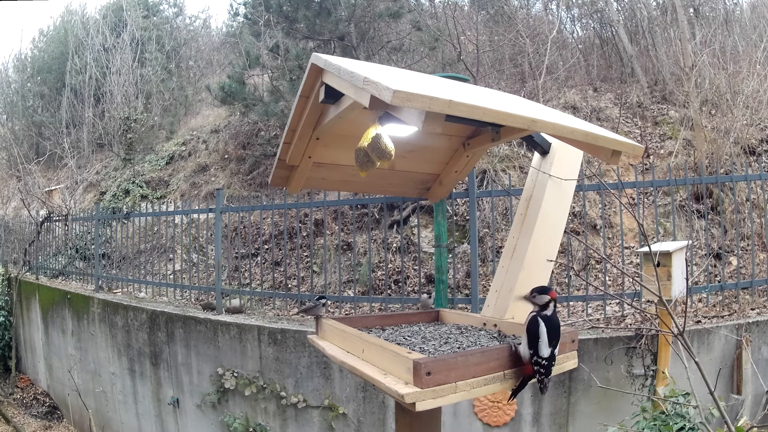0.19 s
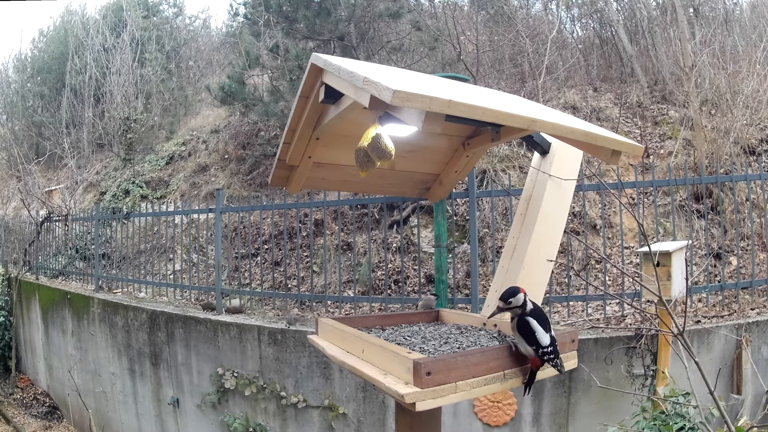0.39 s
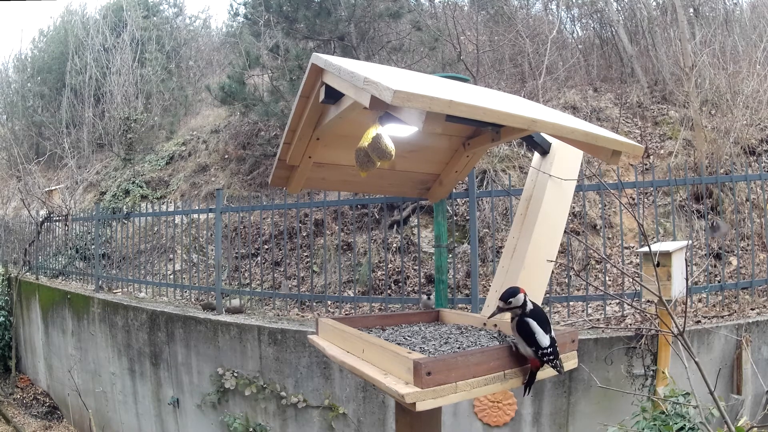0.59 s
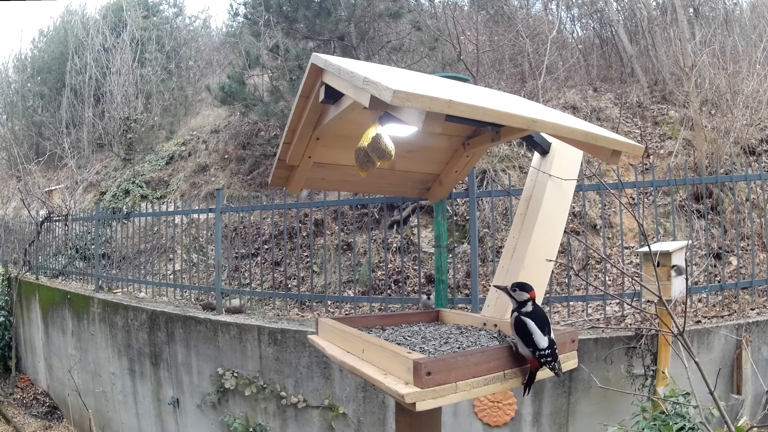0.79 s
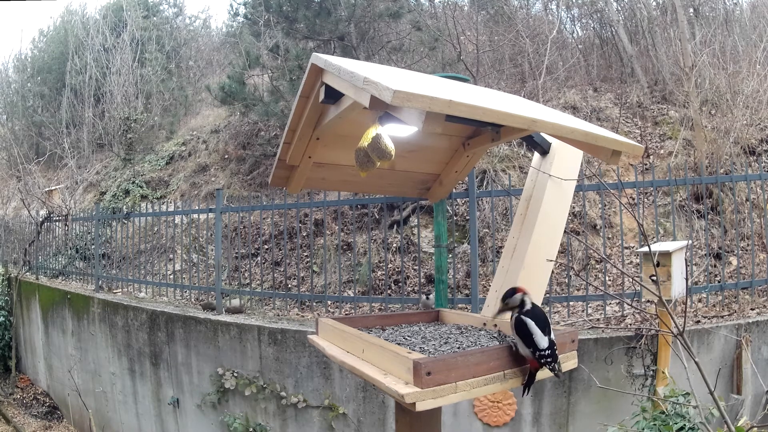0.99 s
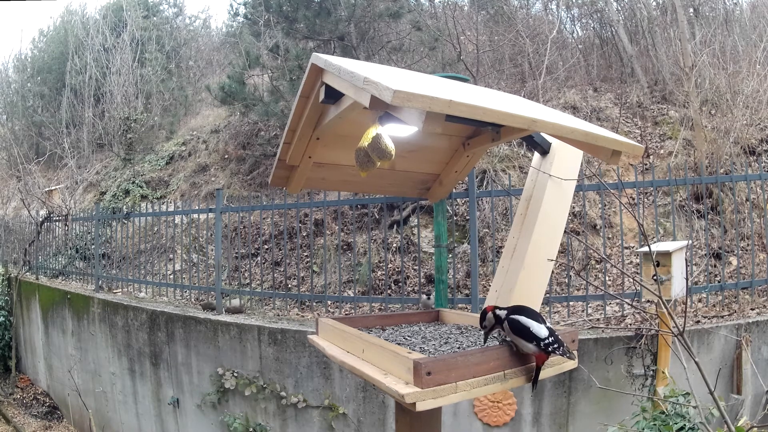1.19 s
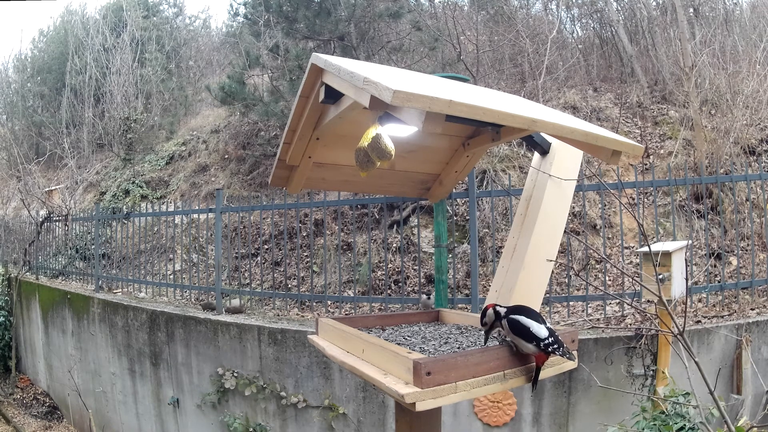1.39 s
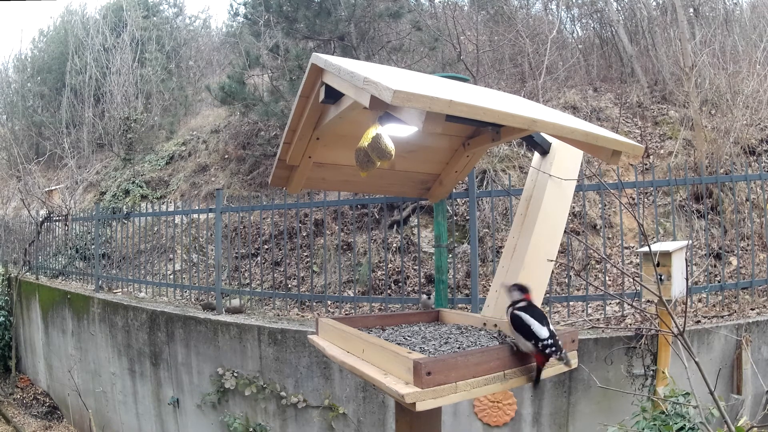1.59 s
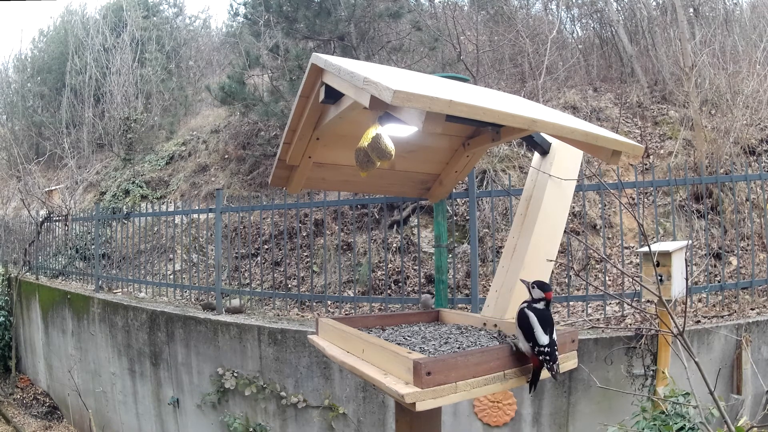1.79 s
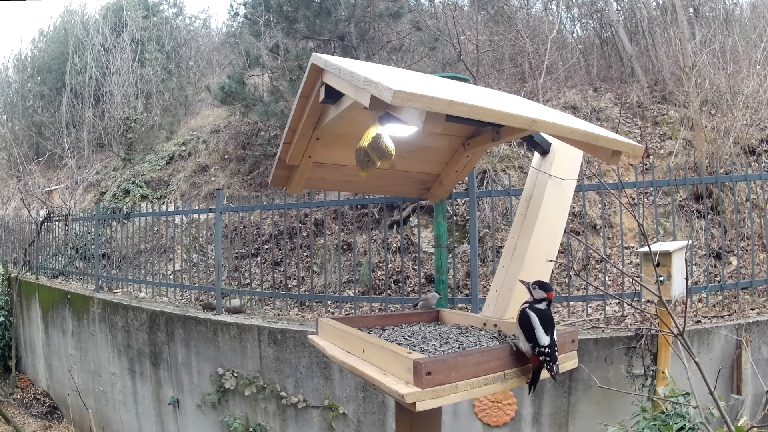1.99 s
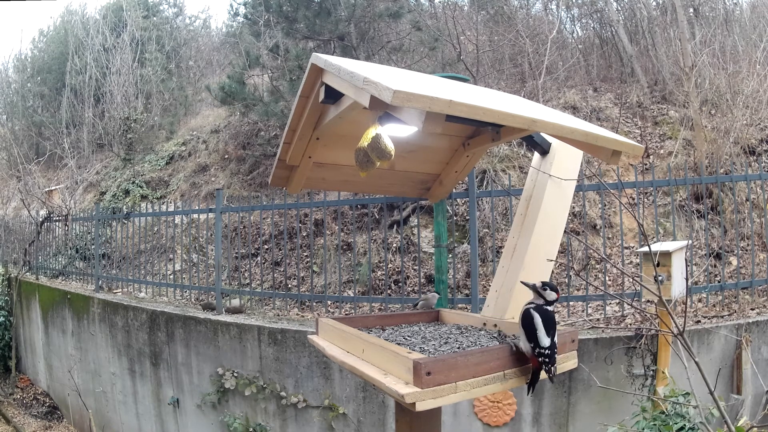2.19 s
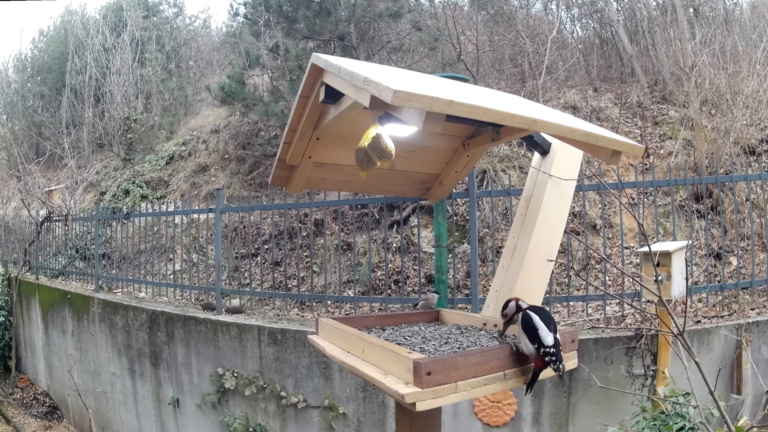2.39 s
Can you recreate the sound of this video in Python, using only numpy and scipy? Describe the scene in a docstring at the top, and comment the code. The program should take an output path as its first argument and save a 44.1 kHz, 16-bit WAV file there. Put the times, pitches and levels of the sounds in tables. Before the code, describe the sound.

Close to the microphone, beak and claws strike a wooden feeder tray, loudest early with wing thumps and a squeaky scrape, then faint dry pecks and seed ticks; garden hush left, hiss and buzz right.

```python
"""A woodpecker pecks and shuffles on a wooden tray: sharp contacts and crunches excite its damped modes.
Claws scrape by dense random catches and squeak by stick and slip; loose seeds tick faintly.
A small bird flaps off first: wingbeats push and pull air and leave eddies; feathers flutter later.
These are on the left with garden noise and a faint whine; the right has hiss and a camera's pulsing buzz."""
import sys
import numpy as np
from scipy import signal
from scipy.fft import rfft, irfft
from scipy.io import wavfile
from scipy.ndimage import uniform_filter1d

SR = 44100
rng = np.random.default_rng(int(sys.argv[2]) if len(sys.argv) > 2 else 0)


def to_wav(s):
    """Save 16-bit WAV."""
    ch = np.atleast_2d(s).T  # columns
    pcm = np.round(np.clip(ch, -1, 1) * 32767)  # PCM
    wavfile.write(sys.argv[1], SR, pcm.astype(np.int16))


N = 110250  # samples, 2.5 s

# Beak and claw contacts with the tray:
# start_s [s], strength_db [dB], bass_db [dB], treble_db [dB], crunch_s [s], focus_hz [Hz]
CONTACTS = [(0.2265, -40.5, 19, -1, 0.0005, 4600), (0.2504, 1.5, 3.5, -7, 0.00015, 4510),
            (0.2507, -10, 9.5, -5, .0008, 2600), (0.2557, -7.5, -15, 2, 0.002, 4030),
            (.26, -12, -2, 4.5, 0.0019, 9400), (0.291, -20, 12, 9, 0.0029, 4270),
            (.3127, -6.5, 7, -21, .0006, 2516), (0.3137, 7.5, -14, -3, .0005, 3818),
            (0.3132, -7.5, 1, -10, 0.00049, 450), (0.3163, -6.5, 4, 5.5, .0005, 8595),
            (0.3421, -17, 1, -2, 0.0004, 4110), (0.347, -20, -2.5, -1, 0.00062, 4346),
            (0.4265, -23.5, 0, 9, 0.00052, 5900), (0.4267, -36, 16.5, -10.5, 0.00045, 1800),
            (.649, -19.5, 4, 6, 0.00098, 4420), (0.66, -31, -6, 6.5, .0006, 4400),
            (0.6672, -29.5, 9, 5.5, 0.0008, 4400), (.67, -23.5, 0, 8, 0.0013, 4700),
            (0.6955, -23, 6.5, 1, 0.00091, 4010), (0.6968, -22.5, 17, -12, 0.0011, 1130),
            (0.7045, -26.5, 11, 0, 0.00079, 4320), (0.7074, -24, 14, -4, 0.001, 2200),
            (0.726, -30, -18, 10, .0006, 7000), (0.7476, -30, 11.5, -6, .0007, 2230),
            (0.7514, -31, 17, -5, 0.0013, 2000), (0.849, -28.5, -7, -20, 0.0003, 4070),
            (0.854, -42, 22.5, -12, 0.00068, 1780), (0.864, -33.5, 7.5, 3, .002, 1145),
            (0.982, -45.5, -8, -1.5, 0.0012, 3920), (1.065, -36.5, 5.5, -6, 0.0012, 3936),
            (1.112, -30.5, -21.5, -33, 0.0004, 3900), (1.1574, -23, 8, 12, 0.0021, 3940),
            (1.18, -36, 10, 7, 0.00077, 3840), (1.193, -44.5, -13, -9, .001, 3800),
            (1.307, -46.5, -5.5, -1.5, 0.00094, 8310), (1.369, -40, -10, -14, 0.00056, 3990),
            (1.479, -44.5, -9, 2.5, 0.0018, 3680), (1.729, -30.5, 6, -9, 0.0014, 4520),
            (1.731, -28.5, 4, -11, 0.00065, 4200), (1.7406, -34.5, 9, 5, 0.00095, 4150),
            (1.746, -37, -4, -6.5, .0007, 4000), (1.78, -34, 3.5, 2.5, 0.001, 3730),
            (1.801, -40, 7.5, 6, 0.00091, 3900), (1.866, -39.5, 8, -1, 0.00087, 3900),
            (1.8845, -35.5, -16, 5.5, 0.0012, 3880), (1.891, -31, -8, -6, 0.0023, 8200),
            (1.901, -34.5, 3, -0.5, 0.0012, 3890), (1.9296, -43, 12.5, 8, 0.00046, 3930),
            (1.9392, -45, -2, 10, 0.00054, 3760), (1.9868, -44, 9, 5, 0.00088, 3690),
            (2.1684, -46, -8, 4, 0.00075, 3830),]
# Damped modes of the tray, before each touch weights and bends them:
# pitch_hz [Hz], level_db [dB], t60_s [s]
TRAY_MODES = [(380, -20.5, 0.005), (613.5, -18.5, 0.0057), (1130, -16.5, 0.012), (1460, -11, 0.0071),
              (1800, -13.5, 0.011), (2332, -13.5, 0.01), (2660, -11, 0.0063), (3150, -10, .005),
              (3670, -2, 0.0064), (4210, -4, .007), (4950, -4.5, 0.0043), (5900, -15, 0.0051),
              (6613, -7.5, 0.0025), (8265, -1.5, 0.0028), (9220, -11.5, 0.0048), (10780, -20.5, 0.007),
              (13600, -26.5, 0.0023)]
# Claws dragging on wood and seeds:
# start_s [s], length_s [s], level_db [dB rms], bass_db [dB], treble_db [dB], focus_hz [Hz]
CLAW_STROKES = [(0.238, 0.033, -32.5, 8.5, 4, 4300), (0.266, 0.059, -42.5, 12, 0, 4160),
                (0.298, 0.022, -22, -1, -4, 4153), (0.312, 0.072, -42, 7.5, -10, 3800),
                (0.405, 0.056, -52.5, 6.5, 1.5, 5900), (0.628, 0.088, -48.5, 7.5, 0, 4530),
                (0.707, 0.06, -42.5, 12.5, 0.5, 2260), (0.762, 0.029, -44.5, 9.5, -7.5, 2430),
                (0.843, 0.04, -44, 14.5, -12, 1800), (1.169, 0.039, -52, 7.5, 1.5, 4010),
                (1.719, 0.052, -53.5, 9.5, -1, 4380), (1.863, 0.11, -58.5, 13, -4, 3900)]
# Path of a claw slipping in quick regular jerks: time_s [s], slip_rate_hz [Hz], level_db [dB]
SLIP_PATH = [(.265, 830, -38.5), (0.27, 1030, -30), (.274, 1450, -28.5), (.276, 1850, -23),
             (0.286, 2000, -25.5), (.297, 1920, -23), (0.305, 1650, -27.5), (0.311, 1800, -26.5),
             (.322, 1000, -37)]
# Wingbeats, each a push and a pull of air: centre_s [s], half_width_s [s], peak_db [dB]
WINGBEATS = [(0.1931, 0.0015, -21), (0.234, .0048, -7), (.266, .008, -17.5)]
# Strength of the eddies at the microphone: time_s [s], level_db [dB]
EDDY_LEVELS = [(0, -50), (.04, -43), (.1, -52.5), (.165, -46.5), (.19, -31.5), (.24, -24), (.29, -32.5),
               (.34, -44.5), (.45, -59.5), (.62, -49), (.69, -43.5), (.8, -65), (1.81, -67), (1.95, -54.5),
               (2.1, -67.5)]
# Strength of the soft feather flutter: time_s [s], level_db [dB]
FLUTTER_LEVELS = [(1.82, -64), (1.84, -41.5), (1.895, -48.5), (1.93, -67)]
# Noise spectra of eddies, feathers, garden and hiss: pitch_hz [Hz], density_db [relative dB per Hz]
EDDY_SPECTRUM = [(15, 0.5), (35, -0.5), (70, -6), (130, -10), (250, -18.5), (500, -34.5), (2000, -62),
                 (16000, -89)]
FEATHER_SPECTRUM = [(50, -5.5), (115, -2.5), (230, -10), (600, -20.5), (3000, -53)]
GARDEN_SPECTRUM = [(20, -4.5), (60, 0), (130, -5), (300, -13), (700, -18), (1600, -19), (3000, -30),
                   (6000, -36), (9000, -37.5), (12000, -44), (16000, -59.5)]
HISS_SPECTRUM = [(20, 4), (100, -1), (400, -4), (1500, -15), (4000, -20), (9000, -26.5), (12000, -36),
                 (16000, -49.5)]

GARDEN_DB, HISS_DB = -54.5, -60
WHINE_HZ, WHINE_WIDTH_HZ, WHINE_DB = 2785, 23, -72
# electrical buzz: bursts of spikes once a frame, each after a short gap
FRAME_HZ, SPIKE_HZ, FIRST_FRAME_S, GAP_S = 30, 350, 0.0053, 0.0034
SPIKE_DECAY_S, SPIKE_DB, STEADY_CURRENT_DB = 0.00056, -48.5, -49
BUZZ_LOW_HZ, BUZZ_HIGH_HZ = 60, 3100
# response of the tray to a touch
BASS_BELOW_HZ, TREBLE_ABOVE_HZ = 3100, 5800
STIFF_HZ = 900  # modes below this depend less on where the tray is touched
FOCUS_DB, FOCUS_OCTAVES = 9, 0.19
MODE_PULL = 0.35  # share of the way that nearby modes shift towards the focus
SEEDS_PER_S, SEEDS_DB, SEEDS_SPREAD_DB, SEEDS_BASS_DB, SEEDS_TREBLE_DB = 19, -53, 2.5, -16, -6
CATCHES_PER_S, CATCH_SPREAD_DB = 1500, 3
SCRAPE_ATTACK_S, SCRAPE_RELEASE = 0.0034, 0.55  # the release is a share of the stroke
SCRAPE_FOCUS = 0.22  # a moving claw favours one mode less than a knock does
SQUEAK_JITTER, SQUEAK_DB_PER_OCTAVE = 0.04, 4  # jitter is a share of the slip rate
SQUEAK_BASS_DB, SQUEAK_TREBLE_DB = 14, -30
CRUNCH, CRUNCH_RISE_S = 0.69, 0.00042  # norm of the crunch, beside a contact of 0.5
EVENNESS = 0.357  # how evenly a contact feeds all modes, 0-1
# overload
DUCK_ABOVE_DB, DUCK_SHARE = -19, 0.23  # dB of gain lost per dB of excess
PEAK_FALL_DB_PER_S = 28.5  # fall of the held power, not of the gain
CEILING, BAND_EDGE_HZ = 0.9, 15900


def amp(db):
    """Decibels express amplitude ratios logarithmically, twenty to a decade."""
    return 10 ** (np.asarray(db) / 20)


def unit(x):
    """Division by the root mean square gives unit rms."""
    return x / np.sqrt(np.mean(x ** 2) + 1e-20)


def add(mix, start_s, sound):
    """Superposition: a sound is summed into the mix at its start time."""
    part = mix[max(round(start_s * SR), 0):][:len(sound)]
    part += sound[:len(part)]


def noise(spectrum):
    """Spectral shaping: white noise is weighted by frequency and scaled to unit rms."""
    pitch_hz, density_db = np.transpose(spectrum)
    f = np.fft.rfftfreq(N, 1 / SR)
    density = amp(np.interp(np.log(f + 1), np.log(pitch_hz), density_db))
    white = rfft(rng.standard_normal(N))
    return unit(irfft(white * density * (f > 10), N))


def hiss():
    """Broadband random noise: a steady shaped hiss."""
    return amp(HISS_DB) * noise(HISS_SPECTRUM)


def buzz():
    """Periodic excitation: the camera draws bursts of decaying current spikes, one burst a frame."""
    t = np.arange(N) / SR
    since_frame = (t - FIRST_FRAME_S) % (1 / FRAME_HZ)
    since_spike = (since_frame - GAP_S) % (1 / SPIKE_HZ)
    spikes = (since_frame > GAP_S) * np.exp(-since_spike / SPIKE_DECAY_S)
    # the band filter leaves only a brief soft onset of the steady current
    current = amp(SPIKE_DB) * spikes - amp(STEADY_CURRENT_DB)
    band = signal.butter(1, [BUZZ_LOW_HZ, BUZZ_HIGH_HZ], "band", fs=SR)
    return signal.lfilter(*band, current)


def garden():
    """Broadband random noise: the steady background of the garden."""
    return amp(GARDEN_DB) * noise(GARDEN_SPECTRUM)


def whine():
    """Narrow resonance: noise through a sharp peak becomes a faint, steady, fuzzy whine."""
    peak = signal.iirpeak(WHINE_HZ, WHINE_HZ / WHINE_WIDTH_HZ, SR)
    return amp(WHINE_DB) * unit(signal.lfilter(*peak, rng.standard_normal(N)))


def wings():
    """Displaced air: each wingbeat is a push then a pull, with noise for eddies and feather flutter."""
    t = np.arange(N) / SR
    puffs = np.zeros(N)
    for centre_s, half_width_s, peak_db in WINGBEATS:
        x = (t - centre_s) / half_width_s
        puffs -= amp(peak_db) * x * np.exp((1 - x ** 2) / 2)  # extremes at x = -1 and 1
    flutter_db = np.interp(t, *np.transpose(FLUTTER_LEVELS), left=-np.inf, right=-np.inf)
    flutter = amp(flutter_db) * noise(FEATHER_SPECTRUM)
    eddies = amp(np.interp(t, *np.transpose(EDDY_LEVELS))) * noise(EDDY_SPECTRUM)
    return puffs + flutter + eddies


def ring(bass_db, treble_db, focus_hz=None, focus=1):
    """Modal superposition: the touch weights damped modes, and may favour and bend those near a focus."""
    t = np.arange(SR // 40) / SR
    hz, db, t60 = np.transpose(TRAY_MODES)[:, :, None]
    bass = bass_db * (hz < BASS_BELOW_HZ) * np.minimum(hz / STIFF_HZ, 1)
    db = db + bass + treble_db * (hz > TREBLE_ABOVE_HZ)
    if focus_hz:
        near = focus * np.exp(-(np.log2(hz / focus_hz) / FOCUS_OCTAVES) ** 2)
        db = db + FOCUS_DB * near
        hz = hz + MODE_PULL * near * (focus_hz - hz)
    modes = amp(db) * np.exp(-np.log(1000) * t / t60) * np.sin(2 * np.pi * hz * t)
    return modes[::2].sum(0) - modes[1::2].sum(0)  # neighbouring modes alternate in sign


def seeds():
    """Random impulses: loose seeds shift and tick, each faintly ringing the tray."""
    chance, size = rng.random(N), rng.standard_normal(N)
    ticks = (chance < SEEDS_PER_S / SR) * amp(SEEDS_DB + SEEDS_SPREAD_DB * size)
    return signal.fftconvolve(ticks, ring(SEEDS_BASS_DB, SEEDS_TREBLE_DB))[:N]


def scrape(length_s, level_db, bass_db, treble_db, focus_hz):
    """Friction as random impulses: a dense run of tiny catches rings the tray."""
    t = np.arange(0, length_s, 1 / SR)
    size = np.minimum(rng.exponential(1, len(t)), 3)
    sign = rng.choice([-1, 1], len(t))
    caught = rng.random(len(t)) < CATCHES_PER_S / SR
    catches = sign * amp(CATCH_SPREAD_DB * size) * caught
    release = (1 - t / length_s) / SCRAPE_RELEASE
    envelope = np.clip(np.minimum(t / SCRAPE_ATTACK_S, release), 0, 1)
    sound = signal.fftconvolve(catches * envelope, ring(bass_db, treble_db, focus_hz, SCRAPE_FOCUS))
    return amp(level_db) * sound * np.sqrt(len(t)) / (np.linalg.norm(sound) + 1e-12)


def squeak():
    """Stick-slip oscillation: harmonic pulses with an arching, jittered rate ring the tray."""
    time_s, slip_rate_hz, level_db = np.transpose(SLIP_PATH)
    t = np.arange(time_s[0], time_s[-1], 1 / SR)
    jitter = unit(uniform_filter1d(rng.standard_normal(N), size=30))[:len(t)]
    rate_hz = np.interp(t, time_s, slip_rate_hz) * (1 + SQUEAK_JITTER * jitter)
    turns = np.cumsum(rate_hz) / SR
    slips = np.zeros(len(t))
    for k in range(1, 8):
        slips += amp(SQUEAK_DB_PER_OCTAVE * np.log2(k)) * np.cos(2 * np.pi * k * turns)
    sound = signal.fftconvolve(slips, ring(SQUEAK_BASS_DB, SQUEAK_TREBLE_DB))[:len(t)]
    return time_s[0], amp(np.interp(t, time_s, level_db)) * unit(sound)


def causal(gain):
    """Minimum phase: of all spectra with these gains, the one that starts most abruptly."""
    return np.exp(np.conj(signal.hilbert(np.log(gain + 1e-4))))


def knock(start_s, strength_db, bass_db, treble_db, crunch_s, focus_hz):
    """Impact excitation: a graze, one sharp contact and a brief crunch feed the modes of the tray."""
    t = np.arange(-200, 824) / SR
    crunch = rng.standard_normal(len(t)) * np.exp(np.minimum(t / CRUNCH_RISE_S, -t / crunch_s))
    contact = (t == 0) / 2
    blow = np.fft.fft(contact + CRUNCH * crunch / np.linalg.norm(crunch))
    # partly flatten the spectrum, then set the norm
    force = np.fft.ifft(blow / causal(abs(blow)) ** EVENNESS).real
    force *= np.sqrt(1 / 4 + CRUNCH ** 2) / np.linalg.norm(force)
    response = abs(np.fft.fft(ring(bass_db, treble_db, focus_hz)))
    wood = np.fft.ifft(causal(response)).real
    return start_s + t[0], amp(strength_db) * signal.fftconvolve(force, wood)


def scene():
    """Superposition of sources: birds, garden and whine on the left, buzz and hiss on the right."""
    tray = np.zeros(N)
    for contact in CONTACTS:
        add(tray, *knock(*contact))
    for start_s, *stroke in CLAW_STROKES:
        add(tray, start_s, scrape(*stroke))
    add(tray, *squeak())
    left = tray + seeds() + wings() + garden() + whine()
    right = buzz() + hiss()
    return np.array([left, right])


def record(dry):
    """Overload and gain reduction: strong left power lowers both gains; clipping and a low-pass follow."""
    power = signal.lfilter([1 / 441], [1, 1 / 441 - 1], dry[0] ** 2)  # 10 ms average
    power_db = 10 * np.log10(abs(power) + 1e-12)
    fall_db = np.arange(N) * PEAK_FALL_DB_PER_S / SR
    held_db = np.maximum.accumulate(power_db + fall_db) - fall_db
    over_db = np.maximum(held_db - DUCK_ABOVE_DB, 0)
    clipped = np.clip(dry * amp(-DUCK_SHARE * over_db), -CEILING, CEILING)
    low_pass = signal.firwin(255, BAND_EDGE_HZ, window=("kaiser", 8), fs=SR)
    return signal.oaconvolve(clipped, low_pass[None], "same")


dry = scene()
out = record(dry)
to_wav(out)
```